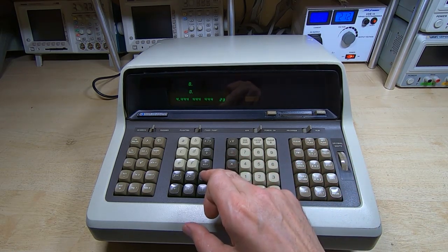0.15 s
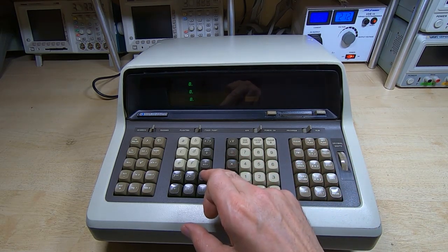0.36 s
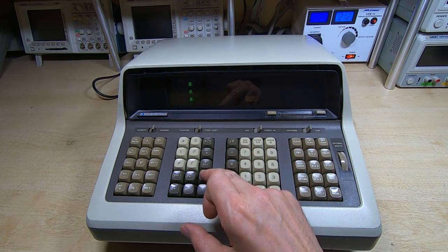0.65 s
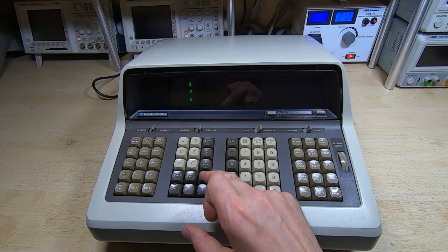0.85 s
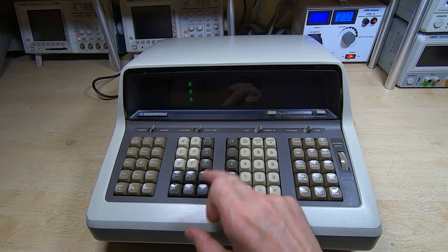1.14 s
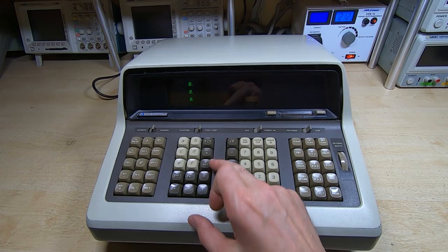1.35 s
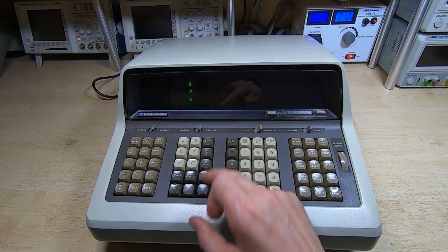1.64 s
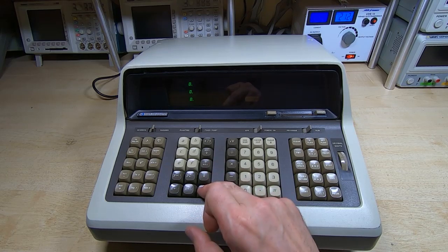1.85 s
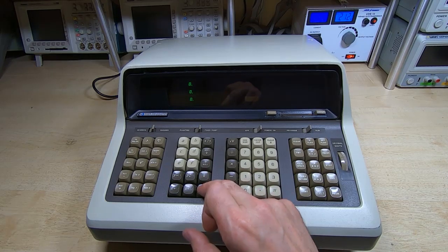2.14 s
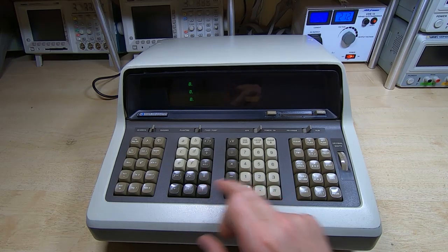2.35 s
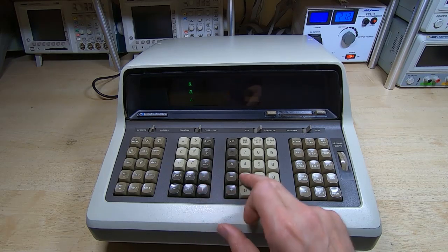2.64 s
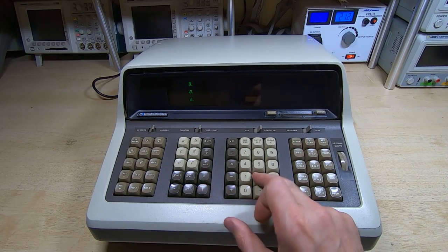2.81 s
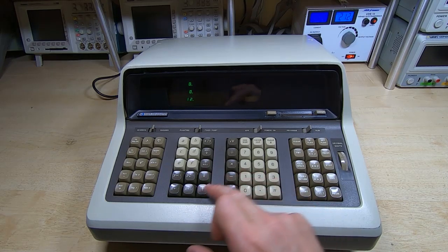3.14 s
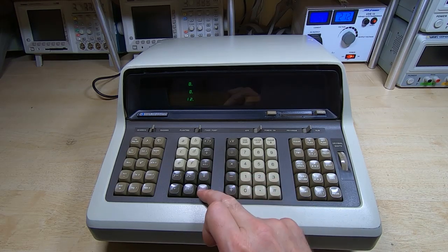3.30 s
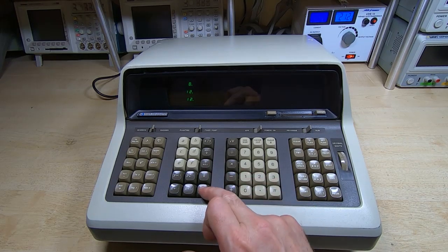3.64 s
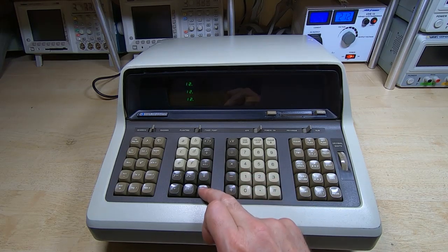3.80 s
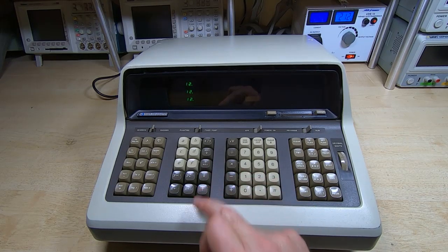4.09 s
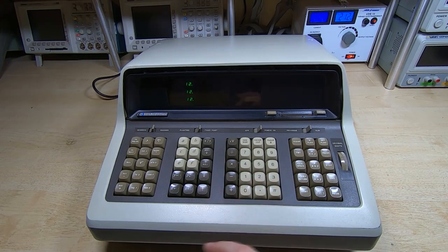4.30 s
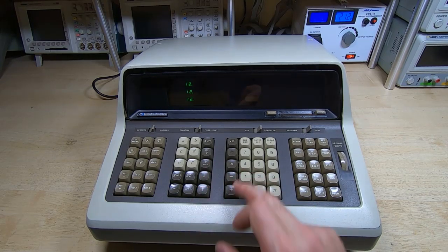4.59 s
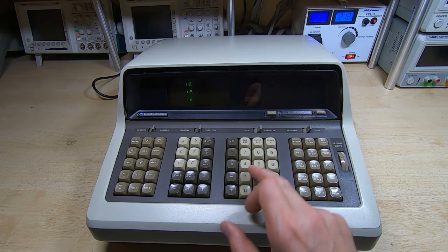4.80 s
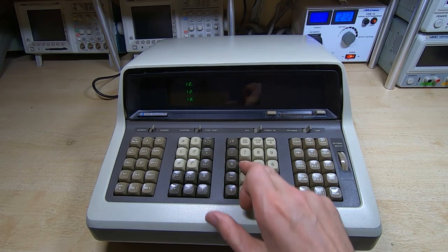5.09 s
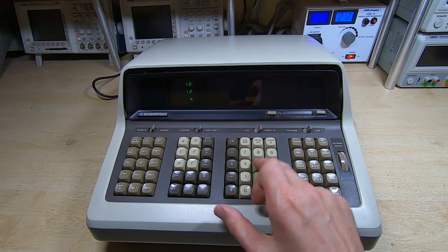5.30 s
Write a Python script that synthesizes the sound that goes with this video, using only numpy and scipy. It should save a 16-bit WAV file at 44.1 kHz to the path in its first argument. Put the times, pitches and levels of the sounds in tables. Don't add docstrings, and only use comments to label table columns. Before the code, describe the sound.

A finger works an old desk calculator in a small workshop. Three lighter clicks come quickly, then pairs of heavier clacks separated by pauses. Each key snaps down and snaps back against its stop about a tenth of a second later, with a brief rattle and a hollow case knock. Low mains hum and soft hiss continue underneath. Close mono microphone, short room reflections.

```python
import sys
import numpy as np
from scipy import signal
from scipy.fft import rfft, irfft
from scipy.io import wavfile
from scipy.ndimage import uniform_filter1d

SR = 44100
rng = np.random.default_rng(int(sys.argv[2]) if len(sys.argv) > 2 else 0)


def makeup_ratio(level_db):
    decades = np.asarray(level_db, float) / 20
    return 10 ** decades


def wav_record(signal):
    frames = np.transpose(np.atleast_2d(signal))
    bounded = np.clip(frames, -1, 1)
    quanta = np.round(bounded * 32767).astype(np.int16)
    wavfile.write(sys.argv[1], SR, quanta)


N = 240462

# (rise [ms], blow delay [ms], rattle decay [ms], tick [dB], rebound [dB], crack [dB],
# thud [dB])
TOUCH_KIND = (0.6, 0.8, 8.5, 2, 1, -6.5, -9)
PRESS_KIND = (0.25, 2, 7.5, 7, 2.5, -22.5, -7.5)
# (from time [s], stem pitch [factor], spring shimmer [dB], cover re case [dB],
# springs re case at the stop [dB])
RISING_KEYS = [
    (0, 1.035, 2, -13.5, -23.5),
    (1.3, 0.98, -12, -13, -32),
    (2.4, 1.01, 6, -7, -24),
    (2.77, 1.1, 1, -3, -16.5),
    (3.1, 0.958, -18, -14, -28),
    (4.9, 1.0962, 5, -8.5, -26),
]


def evened(x):
    return x / np.sqrt(np.mean(x ** 2) + 1e-20)


def peaked(x):
    return x / (abs(x).max() + 1e-12)


def read(points, hz):
    f, value = np.transpose(points)
    return np.interp(np.log(hz + 1), np.log(f + 1), value)


def coloured(x, points):
    hz = np.fft.rfftfreq(len(x), 1 / SR)
    return irfft(rfft(x) * makeup_ratio(read(points, hz)), len(x))


def whitened(x, size=120):
    z = rfft(x)
    even = irfft(z / np.sqrt(uniform_filter1d(abs(z) ** 2, size=size)), len(x))
    return even * (np.arange(len(x)) < len(x) // 2)


def raised(table, factor):
    return [(hz * factor, *rest) for hz, *rest in table]


def under_finger(table, s):
    return [key for key in table if key[0] <= s][-1][1:]


def add(mix, s, sound):
    part = mix[round(s * SR):][:len(sound)]
    part += sound[:len(part)]


def hum():
    # (frequency [Hz], rms level [dB])
    mains = [(50, -41), (100, -63.5), (150, -55.5), (250, -64.5), (350, -66), (500, -74.5), (529, -61.5)]
    # (frequency [Hz], density [dB per Hz])
    hiss_spectrum = [(35, -21), (60, -5.5), (102, -11.5), (149, -11.5), (197, -14.5), (254, -15),
                     (404, -17.5), (535, -16), (600, -18.5), (2430, -29), (13900, -36), (15600, -36.5)]
    rumble_hz, rumble_db, hiss_db = 24.704, -43.5, -45.5
    t = np.arange(N) / SR
    tones = np.zeros(N)
    for hz, db in mains:
        tones += np.sqrt(2) * makeup_ratio(db) * np.sin(2 * np.pi * (hz * t + rng.random()))
    hz = np.fft.rfftfreq(N, 1 / SR)
    slope = (hz / (hz + 3.145)) / (1 + (hz / rumble_hz) ** 2)
    rumble = irfft(rfft(rng.standard_normal(N)) * slope, N)
    hiss = coloured(rng.standard_normal(N), hiss_spectrum)
    return tones + makeup_ratio(rumble_db) * evened(rumble) + makeup_ratio(hiss_db) * evened(hiss)


def workshop(x):
    # (frequency [Hz], t60 [s])
    room_t60 = [(300, 0.26), (1000, 0.29), (3000, 0.27), (8000, 0.33), (16000, 0.18)]
    taps = np.zeros(SR // 2)
    at = np.arange(200, SR // 2 - 20, 20)
    taps[at + rng.integers(0, 20, len(at))] = rng.choice([-1., 1.], len(at))
    hz, t, z = signal.stft(taps, SR, nperseg=256)
    decay = makeup_ratio(-60 * t / read(room_t60, hz)[:, None])
    tail = signal.istft(z * decay, SR, nperseg=256)[1]
    return signal.fftconvolve(x, tail / np.linalg.norm(tail))[:N]


def ring(modes, drive, spread_db, detune):
    hz, db, t60 = np.array(modes).T[:, :, None]
    level_chance, pitch_chance = rng.standard_normal((2, len(modes), 1))
    t = np.arange(len(drive)) / SR
    decay = makeup_ratio(db + spread_db * level_chance - 60 * t / t60)
    response = decay * np.sin(2 * np.pi * hz * (1 + detune * pitch_chance) * t)
    return peaked(signal.fftconvolve(drive, response.sum(0))[:len(drive)])


def haze(points, drive, t60):
    t = np.arange(len(drive)) / SR
    response = rng.standard_normal(len(drive)) * makeup_ratio(-60 * t / t60)
    dying = signal.fftconvolve(drive, response)[:len(drive)]
    return peaked(coloured(whitened(dying), points) * (t < t[-1] / 2))


def housing(blow, ms_after, case_db, cover_db, thud_db):
    # (frequency [Hz], level [dB], t60 [s])
    case_modes = [(371, -9, 0.18), (422, -5.5, 0.09), (449, -2, 0.18), (496, -1.5, 0.22), (530, -4, 0.19),
                  (565, -7, 0.1)]
    # (frequency [Hz], level [dB], t60 [s])
    cover_modes = [(612, -2.5, 0.13), (691, -8, 0.25), (740, -5.5, 0.2308), (797.8, -1, 0.16),
                   (926.73, -9.5, 0.068)]
    thud_hz, thud_ms = 465 * rng.uniform(1.0, 1.04), 7.2
    swell = np.tanh(ms_after / 1.4) * np.exp(-(ms_after / thud_ms) ** 3)
    thud = swell * np.sin(2 * np.pi * thud_hz * ms_after / 1000)
    case = ring(case_modes, blow, spread_db=1.5, detune=0.004) + makeup_ratio(thud_db) * thud
    cover = ring(cover_modes, blow, spread_db=3.0, detune=0.0033)
    return makeup_ratio(case_db - 0.6) * case + makeup_ratio(cover_db + 2.0) * cover


def key_plate(late, plate_db, lever_mode):
    # (frequency [Hz], level [dB], t60 [s])
    plate_modes = [(979, -5, 0.087), (1083, -4.5, 0.054), (1192, -2, 0.067), (1261, 0.5, 0.038),
                   (1362, -3.5, 0.05), (1480, -9, 0.06), (1674, -9, 0.058), (1850, -6, 0.063)]
    # (frequency [Hz], level [dB])
    buzz = [(600, -49), (950, -6), (1300, 2.5), (1600, -8), (1900, -7), (2400, -28)]
    plate = makeup_ratio(-1.0) * ring(plate_modes, late, spread_db=5.5, detune=0.0046)
    plate += ring_lever(late, lever_mode)
    plate += makeup_ratio(-2.5) * haze(buzz, late, t60=0.069)
    return makeup_ratio(plate_db) * plate


def ring_lever(late, lever_mode):
    hz, db, t60 = lever_mode
    return makeup_ratio(db) * ring([(hz, 0, t60)], late, spread_db=0, detune=0.0038)


def stem_and_latch(rattle, tick, ms, stem_db, latch_db, crack_db, pitch):
    # (frequency [Hz], level [dB], t60 [s])
    stem_modes = [(1988, -19.5, 0.033), (2240, 10, 0.037), (2470, -6, 0.19), (2484, 17, 0.0379),
                  (2784, -17, 0.033), (2870, 0, 0.0455), (2820, -3.5, 0.047), (2914.7, 13, 0.049),
                  (2920, -23, 0.21), (3160.9, 13.5, 0.01744), (3279, -22.5, 0.13), (3257, -24.5, 0.033),
                  (3864, -29, 0.039)]
    # (frequency [Hz], level [dB])
    clatter = [(900, -3), (1400, -6), (2050, -12), (2500, 0), (3100, 2), (3450, -6.5), (3850, -26),
               (5000, -26)]
    # (frequency [Hz], level [dB])
    latch = [(1900, -28), (2350, -2), (2800, 0.5), (3350, -2), (3900, -31)]
    # (frequency [Hz], level [dB])
    crack = [(2500, 4.5), (4200, 10.5), (5500, 0), (6800, 4), (9000, -21), (12000, -32)]
    out = makeup_ratio(-15.5) * ring(raised(stem_modes, pitch), rattle, spread_db=4, detune=0.015)
    out += makeup_ratio(-2.5) * haze(raised(clatter, pitch), rattle, t60=0.048)
    out += makeup_ratio(latch_db - 10.5) * haze(raised(latch, pitch), tick, t60=0.022)
    out += makeup_ratio(crack_db) * haze(crack, rattle * np.exp(-ms / 16.07), t60=0.041)
    return makeup_ratio(stem_db) * out


def springs_and_leaves(rattle, tick, springs_db, shimmer_db, tick_db):
    # (frequency [Hz], level [dB])
    spring_haze = [(6000, -14.5), (8000, -11.5), (9900, -10), (11000, -7), (12500, -6.5), (13500, -1),
                   (14300, -6), (15000, -10.5), (15800, -8), (16800, -9)]
    # (frequency [Hz], level [dB])
    shimmer = [(12300, -32), (13500, -2), (14400, 4), (15200, -6), (16200, -28)]
    # (frequency [Hz], level [dB], t60 [s])
    leaves = [(8150, -7, 0.035), (9950, -7, 0.08), (10900, -1, 0.03), (12060, 4, .01), (14200, 12, 0.011)]
    out = makeup_ratio(3.5) * haze(spring_haze, rattle, t60=0.026)
    out += makeup_ratio(shimmer_db + 0.5) * haze(shimmer, rattle, t60=0.0884)
    out += makeup_ratio(tick_db - 7) * ring(leaves, tick, spread_db=2.5, detune=0.006)
    return makeup_ratio(springs_db) * out


def contact(s, levels, kind, seat, lever=None):
    # (extra travel [ms], frequency [Hz], level [dB], t60 [s])
    idle_lever = (0, 1300, -60, .1)
    stem_db, case_db, cover_db, plate_db, springs_db = levels
    rise_ms, delay_ms, rattle_ms, tick_db, rebound_db, crack_db, thud_db = kind
    pitch, snap_db, shimmer_db = seat
    travel_ms, lever_hz, lever_db, lever_t60 = lever or idle_lever
    if kind is PRESS_KIND:
        delay_ms = delay_ms + travel_ms
    else:
        lever_t60 = lever_t60 * 0.5
    ms = np.arange(SR // 4) * 1000 / SR

    chatter = evened(uniform_filter1d(rng.standard_normal(len(ms)), size=40))
    rebound_ms = 10.94 * rng.uniform(0.69, 1.3)
    rebound = makeup_ratio(rebound_db - 4.5) * np.exp(-abs(ms - rebound_ms) / 0.49)
    tick_envelope = makeup_ratio(tick_db) * np.exp(-ms / 0.39)
    rattle_envelope = makeup_ratio(3.1 * chatter) * np.exp(-ms / rattle_ms)
    noise = rng.standard_normal(len(ms)) * (1 - np.exp(-ms / rise_ms))
    rattle = whitened(noise * (rattle_envelope + tick_envelope + rebound))
    tick = whitened(noise * tick_envelope)

    blow = np.exp(-0.5 * ((ms - delay_ms) / 0.15) ** 2)
    blow = blow / np.linalg.norm(blow) + 0.25 * rattle / np.linalg.norm(rattle)
    late = np.roll(rattle, round(delay_ms * SR / 1000))

    parts = housing(blow, np.maximum(ms - delay_ms, 0), case_db, cover_db, thud_db)
    parts += key_plate(late, plate_db, (lever_hz, lever_db, lever_t60))
    parts += stem_and_latch(rattle, tick, ms, stem_db, tick_db + snap_db, crack_db, pitch)
    parts += springs_and_leaves(rattle, tick, springs_db, shimmer_db, tick_db)
    return s, parts


def going_down(row, kind):
    # (from time [s], stem pitch [factor], latch snap [dB], cover re case [dB], springs re stem [dB])
    sinking_keys = [(0, 1.03, 2.5, -9, -9), (1.3, 0.98, 4, -8, -7.5), (2.4, 1.0108, -3, -3.5, -10),
                    (2.77, 0.91, 6.5, 1, -36.5), (3.1, 0.984, 4, -9, -9), (4.05, 0.856, -1.5, -5, -10.5),
                    (4.9, 1.05, 1, -3, -7.5), (5.3, 1.01, 3.5, 1, -10.5)]
    # (from time [s], extra travel [ms], frequency [Hz], level re plate [dB],
    # t60 [s])
    levers = [(0, 6.5, 1290, -1, .08), (1.3, 1.45, 1220, -8, .06), (2.4, .01, 1390, -8, .12),
              (2.77, .01, 1358, -15, 0.07645), (3.1, 3.1, 1220, -9, .05), (4.05, .01, 1150, -1, .035),
              (4.9, .01, 1376, -2.5, .15), (5.3, .01, 1369, -8, 0.14)]
    shimmer_db = -12.5
    s, stem_db, case_db, plate_db = row
    pitch, snap_db, cover_db, springs_db = under_finger(sinking_keys, s)
    if kind is TOUCH_KIND:
        case_db, cover_db, springs_db = case_db - 14, 14, springs_db - 5.5
    levels = stem_db, case_db, case_db + cover_db, plate_db, stem_db + springs_db
    return contact(s, levels, kind, (pitch, snap_db, shimmer_db), under_finger(levers, s))


def letting_go(row, kind):
    case_re_stem_db, cover_re_stem_db, snap_db = -18.5, -11, -2.5
    s, stem_db, plate_db, springs_db = row
    pitch, shimmer_db, *_ = under_finger(RISING_KEYS, s)
    levels = stem_db, stem_db + case_re_stem_db, stem_db + cover_re_stem_db, plate_db, springs_db
    return contact(s, levels, kind, (pitch, snap_db, shimmer_db - 4))


def returning(row, kind):
    snap_db = -2.5
    s, stem_db, case_db, plate_db = row
    pitch, shimmer_db, cover_db, springs_db = under_finger(RISING_KEYS, s)
    levels = stem_db, case_db, case_db + cover_db, plate_db, case_db + springs_db
    return contact(s, levels, kind, (pitch, snap_db, shimmer_db))


def keys():
    # (time [s], key stem [dB], housing [dB], key plate [dB])
    touches = [(0.217, -50.5, -44.5, -44), (0.2321, -48, -41, -54.5), (0.471, -54, -39.5, -42.5),
               (0.7402, -31.5, -40, -35.5), (1.8155, -43, -34, -32.5), (2.073, -36.5, -31, -27.5),
               (2.6131, -26.5, -36.5, -29.5), (2.813, -29, -41, -34.5), (3.3358, -46.5, -37.5, -40),
               (3.5645, -39, -48, -30.5), (3.7754, -36.5, -34, -34), (4.3603, -45.5, -55, -41.5),
               (5.1156, -30, -48.5, -34.5), (5.3578, -26.5, -44, -38)]
    # (time [s], key stem [dB], housing [dB], key plate [dB])
    rustles = [
        (4.1849, -49, -60, -55),
        (4.6796, -43, -47, -50),
        (4.709, -44, -58, -53),
    ]
    # (time [s], key stem [dB], case [dB], key plate [dB])
    presses = [(0.2658, -23, -28.5, -30), (0.5093, -22.5, -27.5, -31), (0.7716, -21.5, -26.5, -28.5),
               (1.8454, -19, -20.5, -24.5), (2.1016, -18, -18, -24), (2.6378, -17.5, -20, -20),
               (2.836, -20.5, -22.5, -21), (3.602, -18.5, -22, -28), (3.8161, -18.5, -23.5, -26),
               (5.1364, -23, -19.5, -25), (5.3839, -19.5, -22, -23)]
    # (time [s], key stem [dB], key plate [dB], springs [dB])
    releases = [(0.3466, -27.5, -40, -40), (0.5962, -29.5, -35.5, -40.5), (0.8769, -30, -37, -39.5),
                (1.9483, -26, -30, -33.5), (2.1776, -26, -28, -35), (2.71, -25, -31, -40),
                (2.9238, -25, -51, -42.5), (3.687, -23, -29.5, -36), (3.8919, -24.5, -30.5, -33.5),
                (5.2198, -33, -40, -44.5)]
    # (time [s], key stem [dB], case [dB], key plate [dB])
    returns = [(0.3574, -32, -22, -37), (0.6022, -30.5, -20, -47), (0.8875, -30.5, -22.5, -36.5),
               (1.9578, -24.5, -17.5, -26.5), (2.1857, -17.5, -12.5, -23), (2.7201, -24, -17.5, -25),
               (2.9361, -18.5, -19.5, -28), (3.4418, -37.5, -26, -32), (3.6988, -25, -20.5, -26.5),
               (3.903, -29, -19, -25), (5.2318, -23, -16.5, -29.5)]
    release_kind = (0.0034, 3, 9, 9, -13, -11.5, -18)
    return_kind = (0.2, 1.55, 3.5, 6, 2, -8.5, -1.5)
    case_low_hz = 395.21
    out = np.zeros(N)
    for rows, kind, move in ((touches + rustles, TOUCH_KIND, going_down),
                             (presses, PRESS_KIND, going_down),
                             (releases, release_kind, letting_go),
                             (returns, return_kind, returning)):
        for row in rows:
            add(out, *move(row, kind))
    bass_cut = signal.butter(N=6, Wn=case_low_hz, btype="high", fs=SR, output="sos")
    return signal.sosfilt(bass_cut, out)


def scene():
    room_db, shift_hz = -8, 1.1
    clicks = keys()
    turn = 2 * np.pi * shift_hz * np.arange(N) / SR
    echoes = workshop(clicks * np.cos(turn)) + workshop(clicks * np.sin(turn))
    mono = clicks + makeup_ratio(room_db) * echoes + hum()
    return np.array([mono, mono])


def roll_off(x):
    return signal.sosfilt(signal.butter(12, 16820, fs=SR, output="sos"), x)


def record(dry):
    # (frequency [Hz], density [dB per Hz])
    apart_spectrum = [(18, -42), (30, -10), (277, -5.5), (790, -7), (877, -5), (1170, -11), (1480, -7),
                      (3250, -7.5), (13700, -7.5), (15600, -3)]
    apart_db, apart_re_level_db = -70, -30.5
    edge_hz, above_edge_db = 15720, -45
    open_db, open_gain_db = -43, -14
    level = np.sqrt(abs(uniform_filter1d(np.diff(dry[0], prepend=0) ** 2, size=1024)))
    own = evened(coloured(rng.standard_normal(N), apart_spectrum))
    own = own * (makeup_ratio(apart_db) + makeup_ratio(apart_re_level_db) * level)
    both = dry + own * np.array([[1], [-1]])
    lowpass = signal.firwin(255, edge_hz, window=("kaiser", 5), fs=SR)
    limited = signal.oaconvolve(both, lowpass[None], "same")
    top = both - limited
    top_db = 10 * np.log10(abs(uniform_filter1d(top[0] ** 2, size=128)) + 1e-12)
    opened = makeup_ratio(open_gain_db) * np.clip((top_db - open_db) / 4.5, 0, 1) + makeup_ratio(above_edge_db)
    return roll_off(limited + opened * top)


dry = scene()
out = record(dry)
wav_record(out)
```